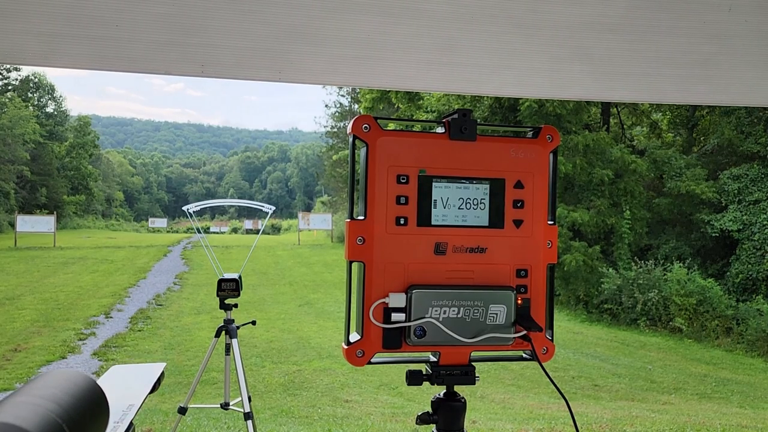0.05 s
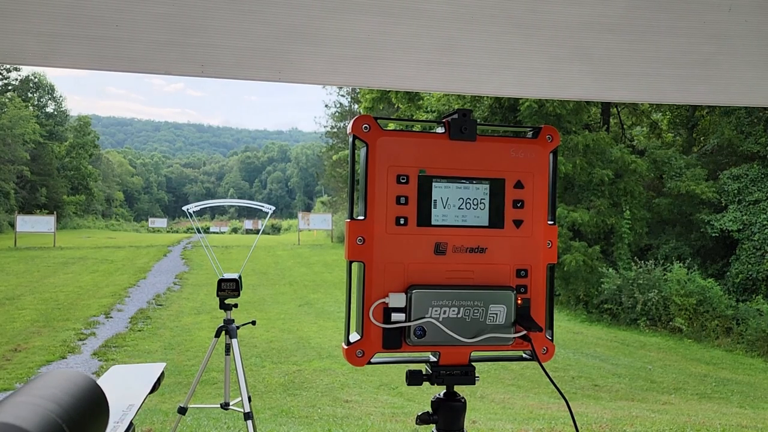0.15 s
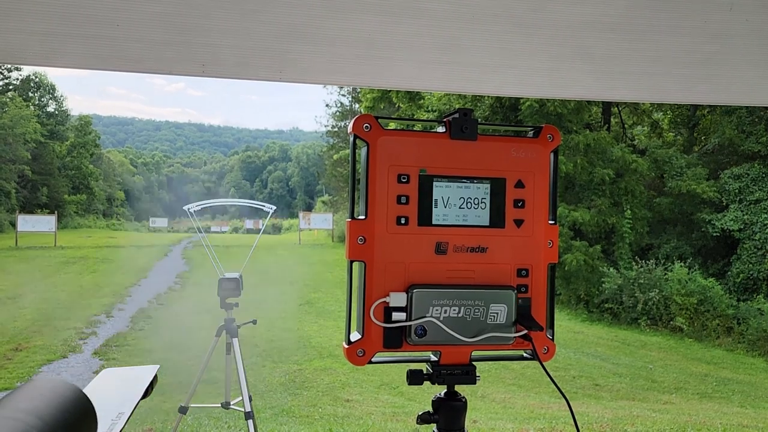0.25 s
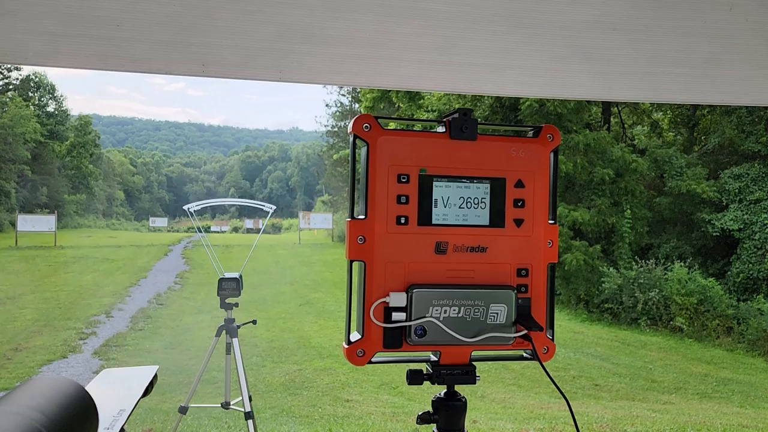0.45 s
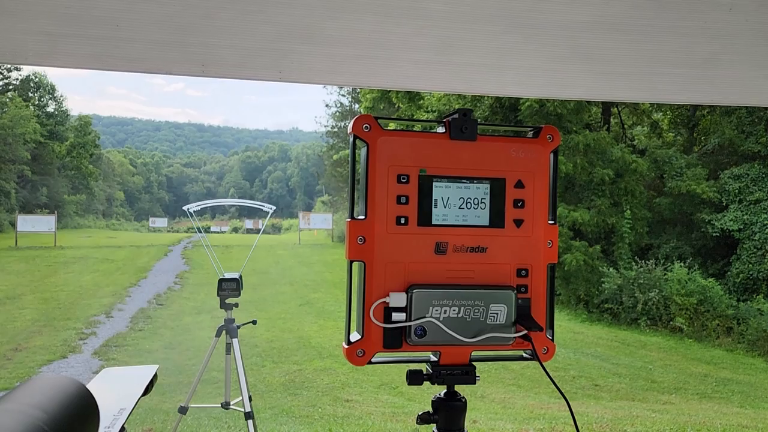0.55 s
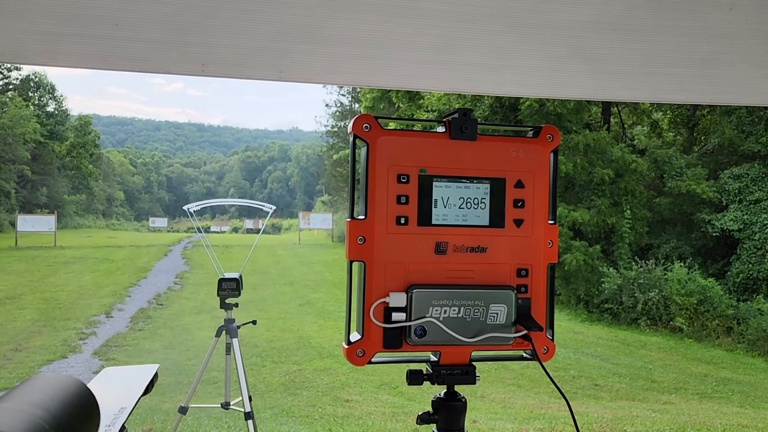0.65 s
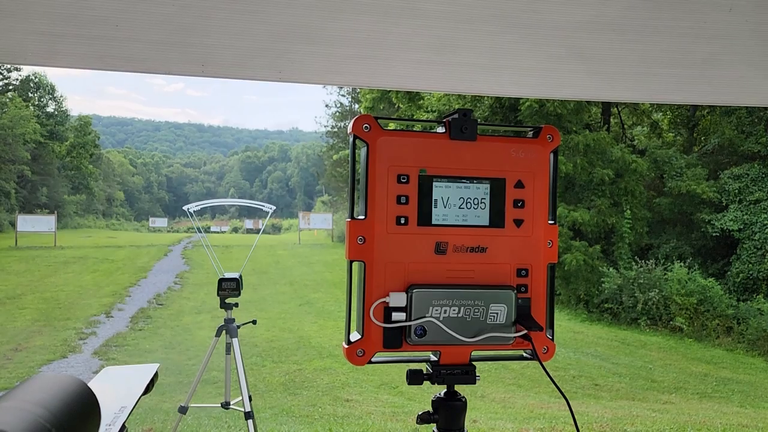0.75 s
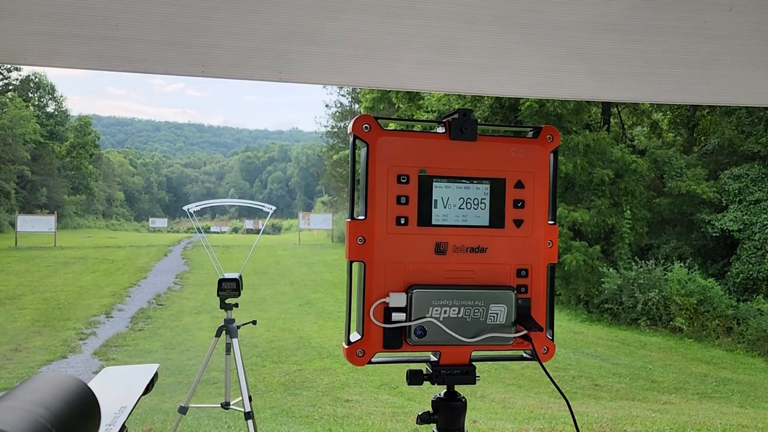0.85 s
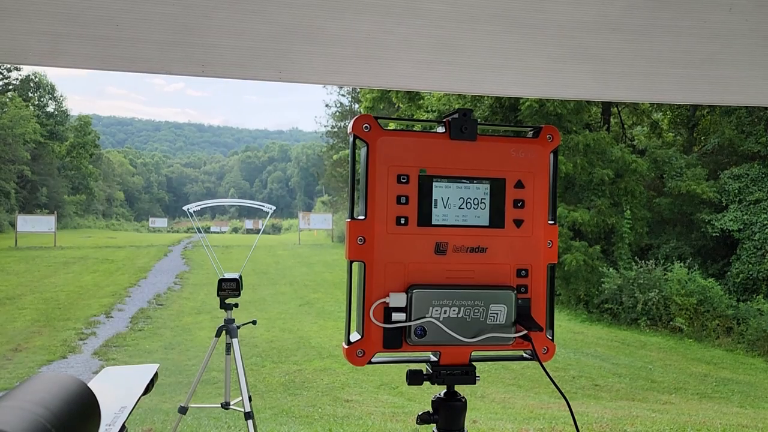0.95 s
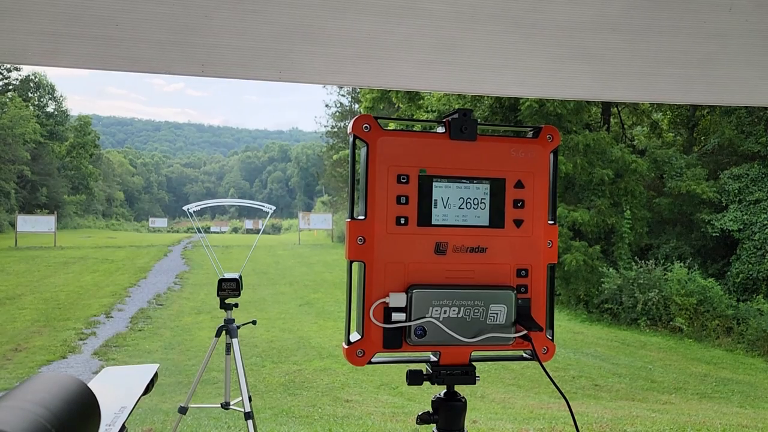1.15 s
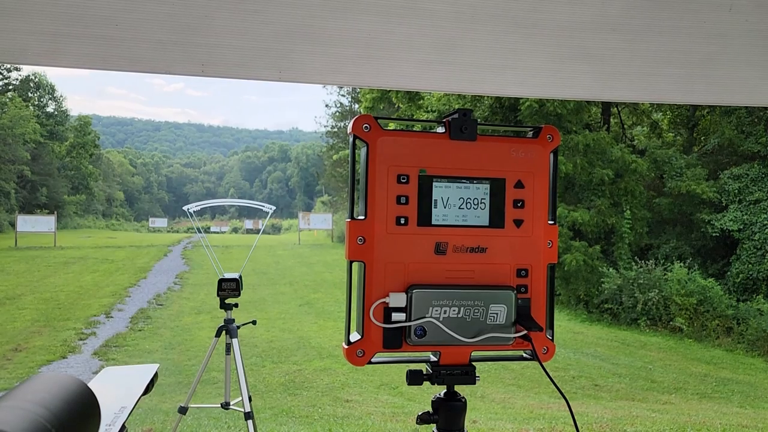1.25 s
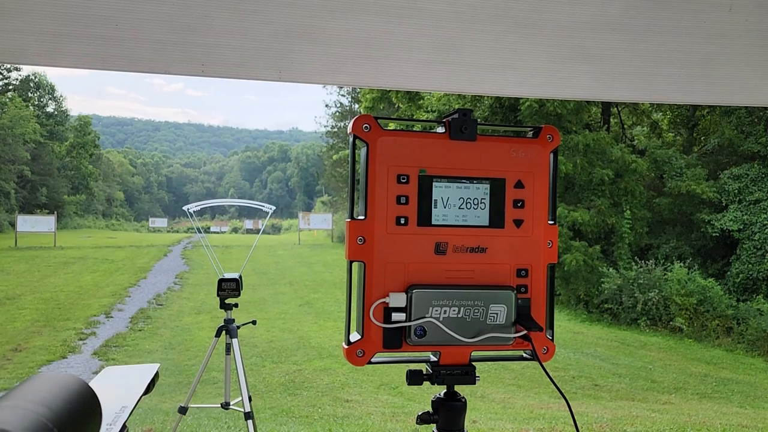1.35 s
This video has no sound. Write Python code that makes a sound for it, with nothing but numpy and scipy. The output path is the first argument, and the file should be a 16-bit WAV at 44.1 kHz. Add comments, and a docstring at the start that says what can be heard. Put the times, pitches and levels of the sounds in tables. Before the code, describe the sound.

A single rifle shot blasts close to an overloaded microphone under an open shelter, booms briefly, slaps back sharply from down range, then rolls dully off wooded hills, with faint ticks and hiss near the end.

```python
"""Faint wind, insects and thin far-off chirps, then one rifle shot from under the roof of an outdoor firing line.
Shaped noise makes the report, which overloads the microphone; noise and low sine modes make the shelter boom.
A hard surface down range slaps it back as a cluster of filtered spikes that leaves sine modes ringing.
The wooded slopes return a long dull roll of noise in three bands, with knocks of decaying sine standing out.
A few light ticks and bright splashes of hiss, both short noise bursts, follow."""
import sys
import numpy as np
from scipy import signal
from scipy.fft import rfft, irfft
from scipy.io import wavfile

SR = 44100
rng = np.random.default_rng(int(sys.argv[2]) if len(sys.argv) > 2 else 0)


def log_audio(samples):
    """Write samples as a 16-bit WAV file to the path given in sys.argv[1]."""
    # one column per channel
    frames = np.atleast_2d(samples).T
    # limit to full scale, then quantise
    limited = np.clip(frames, -1, 1)
    pcm = np.round(limited * 32767).astype(np.int16)
    wavfile.write(sys.argv[1], SR, pcm)


N = 61739
T = np.arange(N) / SR   # s
FREQS = np.maximum(np.arange(N // 2 + 1) * SR / N, 1)   # Hz
SHOT_S = 0.2245

# left-right balance of sound close to the microphone: f/Hz, left over right/dB
NEAR_BALANCE = [(150, 0), (300, 3.5), (700, 0), (8000, 0), (13000, -4.5)]
# balance of sound that favours neither side: f/Hz, left over right/dB
EVEN = [(100, 0), (10000, 0)]


def from_db(db):
    """Decibels to gain."""
    return 10 ** (np.asarray(db) / 20)


def rms_one(x):
    """Scale to unit power."""
    return x / np.sqrt(np.mean(x ** 2) + 1e-20)


def at_hz(points, hz):
    """Read a table on a log-frequency axis."""
    f, v = np.transpose(points)
    return np.interp(np.log(hz), np.log(f), v)


def after(s):
    """Seconds since a moment, zero before it."""
    return np.maximum(T - s, 0)


def pan(db):
    """Left and right gains for a level difference, positive to the left."""
    return from_db(np.array([[.5], [-.5]]) * db)


def from_left(x, lag_s):
    """The right side hears it a moment later."""
    return np.array([x[0], np.interp(T - lag_s, T, x[1])])


def drift(rate_hz):
    """Random wander with spread 1, smoothed above a rate."""
    return rms_one(irfft(rfft(rng.standard_normal(N)) / (1 + (FREQS / rate_hz) ** 2), N))


def duller(x, top_hz):
    """Roll off the treble, half the amplitude being left at top_hz."""
    return irfft(rfft(x) / (1 + (FREQS / top_hz) ** 4), N)


def resonance(hz, width_hz):
    """Gain of one resonance at every frequency, 1 on top."""
    return 1 / (1 + (2 * (FREQS - hz) / width_hz) ** 2)


def narrow(hz, width_hz):
    """Noise in one resonance, unrelated left and right; unit power."""
    return rms_one(irfft(rfft(rng.standard_normal((2, N))) * resonance(hz, width_hz), N))


def reflections(share):
    """Two unrelated streams of noise, a share of the power being sparse single reflections."""
    echoes_per_s = 900
    share = np.clip(share, 0, 1)
    single = rng.standard_normal((2, N)) * (rng.random((2, N)) < echoes_per_s / SR)
    return np.sqrt(share) * rms_one(single) + np.sqrt(1 - share) * rng.standard_normal((2, N))


def field(colour, balance, share=0):
    """Coloured stereo sound from all sides, falling away beyond the ends of its colour; unit power."""
    # how alike the two sides are: f/Hz, left-right correlation
    likeness = [(60, .88), (130, .88), (300, .7), (620, .45), (1400, -.1), (3000, -.03), (15000, 0)]
    mid, side = rfft(reflections(share))
    alike = np.clip(at_hz(likeness, FREQS), -.99, .99)
    both = np.sqrt(1 + alike) * mid + np.sqrt(1 - alike) * side * [[1], [-1]]
    low_skirt = np.minimum(FREQS / colour[0][0], 1) ** 2
    high_skirt = np.minimum(colour[-1][0] / FREQS, 1) ** 2
    gain = from_db(at_hz(colour, FREQS)) * low_skirt * high_skirt
    return rms_one(irfft(both * gain * pan(at_hz(balance, FREQS)), N))


def chirps():
    """Thin gliding whistles far off, perhaps a bird, slightly rough and with a weak octave."""
    # whistles: middle t/s, length/s, level/dB (rms of the fundamental at its height), f/Hz, glide/Hz per s
    whistles = [(0.038, 0.065, -39.5, 1525, -3200), (0.138, 0.14, -61.5, 1580, 300)]
    rough, rough_hz, octave_db = 0.71, 168, -31
    out = 0
    for s, length, db, hz, glide in whistles:
        phase = 2 * np.pi * (hz * (T - s) + glide * (T - s) ** 2 / 2 + rng.random((2, 1)))
        level = from_db(db) * np.maximum(1 - (2 * (T - s) / length) ** 2, 0)
        out = out + level * (np.sin(phase) + from_db(octave_db) * np.sin(2 * phase))
    return np.sqrt(2) * out * (1 + rough * drift(rough_hz))


def background():
    """Gusting low noise for wind, steady noise for still air, a narrow band for insects, and chirps."""
    # wind rumble before gusts: t/s, level/dB
    rumble = [(0, -42.5), (.18, -38.5), (.326, -80), (.62, -49.5), (1.4, -56.5)]
    # spectra of wind and still air: f/Hz, relative level/dB
    wind_colour = [(20, -12), (58, -1.5), (140, -12), (300, -41)]
    air_colour = [(200, -2), (500, -5.5), (1200, -14), (4000, -13.5), (6500, -18), (9000, -30.5),
                  (15500, -26.5)]
    gust_db, gust_rate_hz, air_db = 3.5, 12, -61
    insect_hz, insect_width_hz, insect_db = 5300, 350, -73.5
    wind_level = from_db(np.interp(T, *np.transpose(rumble)) + gust_db * drift(gust_rate_hz))
    wind = wind_level * field(wind_colour, EVEN)
    air = from_db(air_db) * field(air_colour, EVEN)
    insects = from_db(insect_db) * narrow(insect_hz, insect_width_hz)
    return wind + air + insects + chirps()


def report():
    """A ragged swell of noise leads in; then the bright crack and coarse rattle of the muzzle blast under the
    roof, all in noise."""
    # the swell of noise before the crack, before the grain is applied: t/s, level/dB
    swell_level = [(.188, -59), (.198, -30.5), (.203, -24.5), (.209, -17), (.216, -10.5), (.2205, -12),
                   (.2245, -11)]
    # spectra of swell, crack and blast: f/Hz, relative level/dB
    swell_colour = [(200, -16.5), (290, 8), (380, -13.5), (850, 9), (1700, -2.5), (6000, -1), (9300, -14),
                    (12000, 1)]
    crack_colour = [(300, -24.5), (900, -2.5), (2200, 3), (4500, -2), (9500, -4.5), (12500, -3),
                    (15500, -9)]
    blast_colour = [(88, -42), (150, -4.5), (221, -49.5), (296, 8), (381, -38.5), (509, -0.5), (595, -14.5),
                    (912, 1), (2400, -0.5), (2810, -11.5), (3040, -5), (3550, -6.5), (3910, -5.5),
                    (6860, -13.5), (15500, -13.5)]
    # resonances under the roof that colour the blast: f/Hz, boost/dB
    roof_modes = [(1057, 5.5)]
    # hard reflections from bench, posts and roof make the blast jump: t/s, jump in level/dB
    jolts = [(0.2296, 14), (0.2359, 4.5), (0.2485, 2), (0.271, 7)]
    crack_db, crack_s, crack_release_db_per_s = -9, 0.0092, 901
    blast_db, hold_s, sag_db_per_s, release_db_per_s = -7.5, 0.059, 64.5, 433.5
    # the blast's treble has its own level and decay
    treble_hz, treble_db, treble_sag_db_per_s, treble_release_db_per_s = 3010, 2, 66, 279
    roof_width_hz, jolt_s, crackle_db, crackle_rate_hz = 24, .0016, 1.06, 330

    swell_gain = (T < SHOT_S) * from_db(np.interp(T, *np.transpose(swell_level), left=-np.inf))
    swell = swell_gain * field(swell_colour, NEAR_BALANCE)
    crack_gain = from_db(crack_db - crack_release_db_per_s * after(SHOT_S + crack_s))
    crack = crack_gain * field(crack_colour, NEAR_BALANCE)

    roof = from_db(sum(db * resonance(hz, roof_width_hz) for hz, db in roof_modes))
    rattle = rms_one(irfft(rfft(field(blast_colour, NEAR_BALANCE, share=0.29)) * roof, N))
    body = duller(rattle, treble_hz)
    held, released = after(SHOT_S), after(SHOT_S + hold_s)
    body_gain = from_db(-sag_db_per_s * held - release_db_per_s * released)
    treble_gain = from_db(treble_db - treble_sag_db_per_s * held - treble_release_db_per_s * released)
    blast = body * body_gain + (rattle - body) * treble_gain

    jumps_db = sum(db * (T >= s) * np.exp(-after(s) / jolt_s) for s, db in jolts)
    grain = from_db(crackle_db * drift(crackle_rate_hz) + jumps_db)
    return grain * (swell + (T >= SHOT_S) * (crack + from_db(blast_db) * blast))


def shelter():
    """The shelter rings out in bands of noise, treble fastest, and booms in a few low sine modes."""
    # spectrum of the ring-out where its level is set: f/Hz, relative level/dB
    shelter_colour = [(88, -24), (150, -1), (201, -25.5), (308, -1.5), (346, -44), (411, 0.5), (490, -30),
                      (530, -21), (681, -51), (1290, -10.5), (15500, -20)]
    # low modes: f/Hz, level/dB, start t/s, build-up/s, t60/s, left over right/dB
    boom_modes = [(127.1, -18.5, .2245, 0.064, 0.06, -1), (299, -18, 0.23, 0.022, 0.26, -2.5),
                  (320.5, -30, 0.27, 0.017, 0.11, 14), (429, -52, 0.56, 0.088, 0.63, -3)]
    level_db, level_at_s = -34.5, 0.39   # level in the middle of the ring-out
    loss_db_per_s, extra_db_per_s_at_10khz = 43.5, 30
    sound, out = rfft(field(shelter_colour, NEAR_BALANCE)), 0
    edges = np.geomspace(60, 20000, 15)   # Hz
    for low, high in zip(edges, edges[1:]):
        loss = loss_db_per_s + extra_db_per_s_at_10khz * np.sqrt(low * high) / 10 ** 4
        band = irfft(sound * (FREQS >= low) * (FREQS < high), N)
        out = out + band * from_db(level_db - loss * (T - level_at_s))
    for hz, db, start, build, t60, side_db in boom_modes:
        rise = np.minimum(after(start) / build, 1) ** 2
        level = rise * from_db(db - 60 * after(start + build) / t60)
        out = out + pan(side_db) * level * np.sin(2 * np.pi * (hz * T + rng.random()))
    return out * (T >= SHOT_S)


def roll():
    """Countless echoes from trees and slopes: diffuse noise in three bands, each with its own level curve."""
    # level of the roll before build-up and band trims: t/s, bass/dB, middle/dB, treble/dB
    roll_level = [(0.34, -46, -52, -28), (0.374, -37.5, -50.5, -34), (0.46, -36.5, -41.5, -37),
                  (0.515, -43.5, -37, -40.5), (0.543, -37, -46, -43.5), (0.573, -62, -36.5, -39.5),
                  (0.593, -38.5, -31.5, -42.5), (0.803, -40, -35.5, -43.5), (0.857, -41.5, -36.5, -48),
                  (0.925, -44.5, -40.5, -48), (1.205, -53.5, -44, -50), (1.235, -71, -43.5, -54.5),
                  (1.273, -52, -46.5, -54.5), (1.4, -63, -46, -55)]
    # spectra of the three bands: f/Hz, relative level/dB
    bass_colour = [(60, -25), (100, -12.5), (132, -1), (150, -6.5), (185, -16), (260, -32.5)]
    middle_colour = [(170, -24.5), (250, -10.5), (320, -3.5), (450, 2.5), (670, -1.5), (810, -13),
                     (1200, -16.5)]
    treble_colour = [(470, -38), (850, -1.5), (2080, -4.5), (7100, -18), (15500, -47)]
    # balance of sound from far off: f/Hz, left over right/dB
    far_balance = [(150, -0.5), (380, 1), (1000, 1.5), (5000, 3.5), (12000, 13.5)]
    bass_db, middle_db, treble_db = 1.5, -1.5, 0.87   # band trims
    build_s, treble_build_s = .1, 0.28
    s, *levels = np.transpose(roll_level)
    bass, middle, treble = (from_db(np.interp(T, s, db)) for db in levels)
    begun = np.minimum(after(SHOT_S) / build_s, 1)
    treble_begun = np.minimum(after(SHOT_S) / treble_build_s, 1) ** 2
    return (begun * from_db(bass_db) * bass * field(bass_colour, far_balance)
            + begun * from_db(middle_db) * middle * field(middle_colour, far_balance, share=0.34)
            + treble_begun * from_db(treble_db) * treble * field(treble_colour, far_balance, share=0.05))


def spike(s, scatter_db, scatter_s):
    """One returning pressure spike with a little decaying noise scattered behind it."""
    out = from_db(scatter_db) * (T > s) * np.exp(-after(s) / scatter_s) * rng.standard_normal((2, N))
    out[:, int(s * SR)] += 1
    return out


def slap():
    """A tight cluster of pressure spikes comes back from down range, filtered, and leaves modes ringing."""
    # returning spikes, before the cluster's trim: t/s, peak level/dB
    slap_spikes = [(0.4886, -10), (0.4899, -11), (0.4905, -12), (0.4918, -11)]
    # what the return does to the spikes' spectrum: f/Hz, relative level/dB
    slap_colour = [(200, -14), (400, -2.5), (600, 7.5), (1000, -2), (2200, -3), (3300, -29), (4400, -23.5),
                   (6400, -14), (9000, -29), (12500, -18.5), (15500, -33.5)]
    # what is left ringing: f/Hz, level/dB over the first untrimmed spike, t60/s
    ring_modes = [(411, -32, .2), (544, -44, 0.19), (686, -23, 0.22), (990, -34, 0.15)]
    trim_db, scatter_db, scatter_s = -3, -20, .0023
    spikes = sum(from_db(db) * spike(s, scatter_db, scatter_s) for s, db in slap_spikes)
    colour = from_db(at_hz(slap_colour, FREQS))
    cluster = irfft(rfft(spikes) * colour / colour.mean(), N)
    s, db = slap_spikes[0]
    ring = sum(from_db(db + mode_db - 60 * after(s) / t60) * np.sin(2 * np.pi * hz * after(s))
               for hz, mode_db, t60 in ring_modes)
    return from_db(trim_db) * cluster + ring


def knocks():
    """Single echoes from banks and tree lines stand out of the roll, each a short sine at its own pitch."""
    # dull knocks: start t/s, envelope peak level/dB, f/Hz
    knock_rows = [(.568, -28.5, 576), (.596, -29.5, 280), (0.627, -30.5, 354), (.657, -26.5, 512),
                  (0.699, -29.5, 469.3), (.758, -27, 560), (0.967, -32.5, 450)]
    rise_s = 0.0027
    out = 0
    for s, db, hz in knock_rows:
        age = after(s) / rise_s
        out = out + from_db(db) * age * np.exp(1 - age) * np.sin(2 * np.pi * (hz * T + rng.random()))
    return out


def burst(s, db, t60, side_db):
    """Stereo envelope with a sudden start and a steady decay."""
    return pan(side_db) * (T >= s) * from_db(db - 60 * after(s) / t60)


def small_noises():
    """Light ticks and bright splashes of hiss, each a decaying burst of coloured noise."""
    # ticks: t/s, level/dB before dulling, t60/s, left over right/dB, top f/Hz
    tick_rows = [(0.6042, -40, .046, 15.5, 9200), (0.75, -39, 0.075, 10.5, 12000),
                 (1.0987, -27.5, 0.025, 9.5, 3800)]
    # splashes: t/s, level/dB, t60/s, left over right/dB
    splash_rows = [(0.7996, -46, 0.2, -4.5), (1.159, -41, 0.14, -6)]
    # spectra of both: f/Hz, relative level/dB
    tick_colour = [(800, -2.5), (1800, -18), (3800, 3), (6500, 10.5), (9000, -8), (12500, 7.5),
                   (15500, -23)]
    splash_colour = [(900, -7), (3700, 4.5), (6000, -5), (9500, -2.5), (13000, 6.5), (15500, -1)]
    tick, hiss = field(tick_colour, EVEN), field(splash_colour, EVEN)
    ticks = sum(burst(*row) * duller(tick, top_hz) for *row, top_hz in tick_rows)
    splashes = sum(burst(*row) * hiss for row in splash_rows)
    return ticks + splashes


def scene():
    """The range around the microphone, the shot and its echoes."""
    # the slopes lie a little to the left
    slopes = from_left(roll() + knocks(), lag_s=.0002)
    return background() + report() + shelter() + slopes + slap() + small_noises()


def record(dry):
    """Microphone overload rounds the peaks; a low-pass then cuts the top."""
    overload, cutoff_hz = 0.85, 15750   # overload: ceiling of the rounding, full scale = 1
    rounded = overload * np.tanh(dry / overload)
    top = signal.firwin(301, cutoff_hz, fs=SR, window=("kaiser", 7))
    return signal.fftconvolve(rounded, top[None], mode="same", axes=1)


dry = scene()
out = record(dry)
log_audio(out)
```